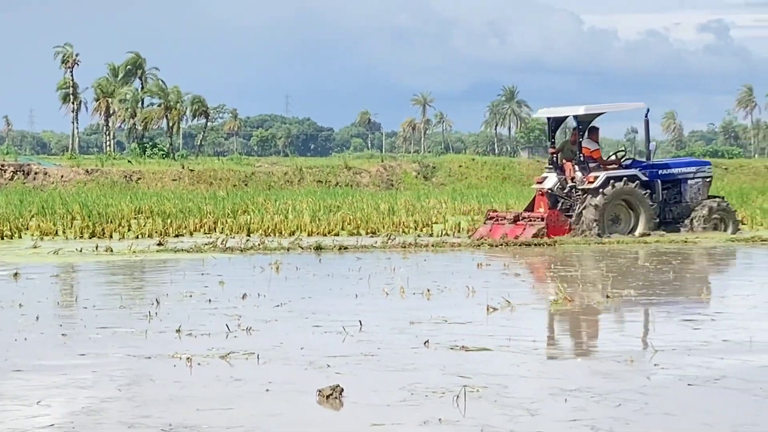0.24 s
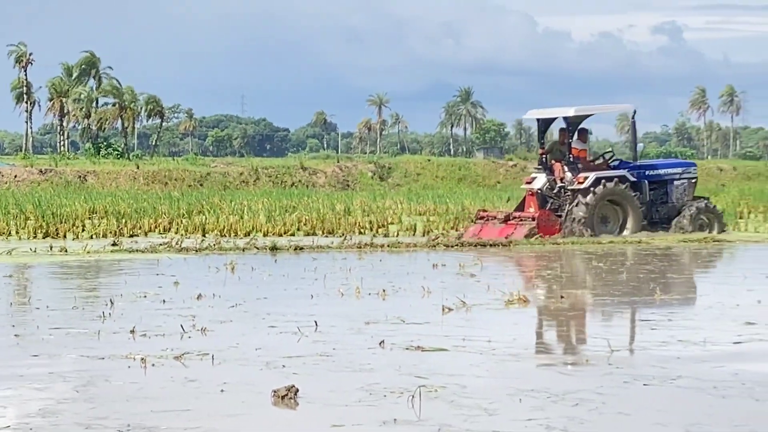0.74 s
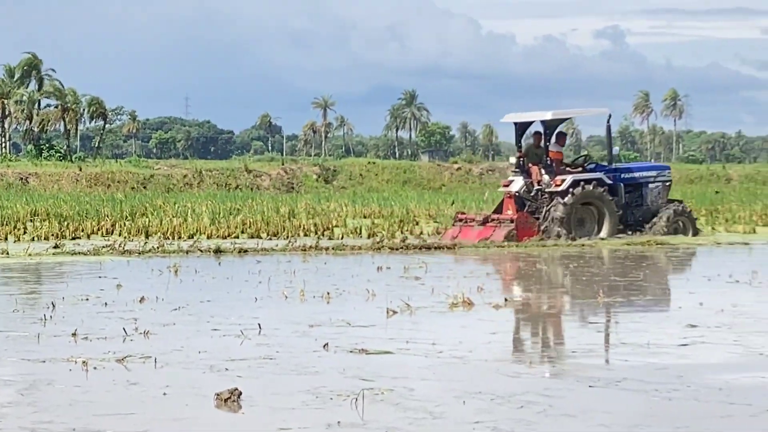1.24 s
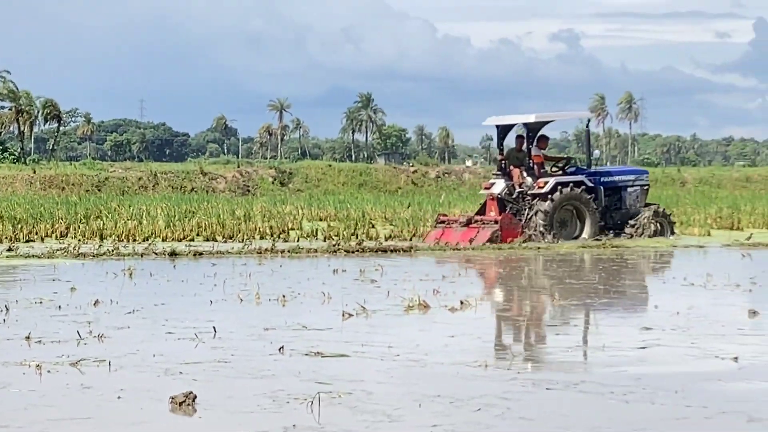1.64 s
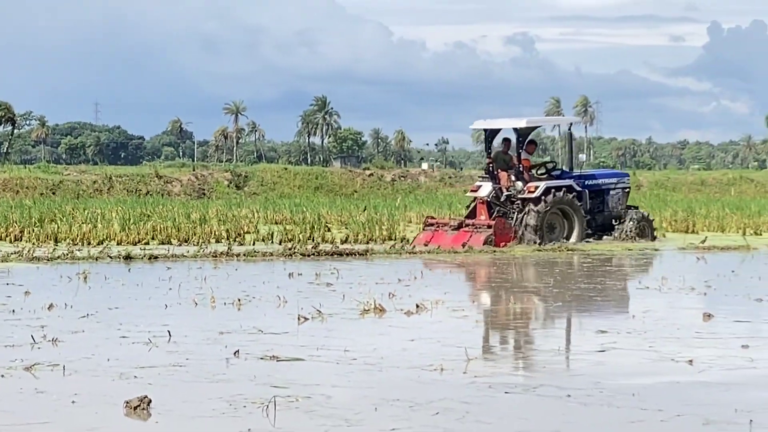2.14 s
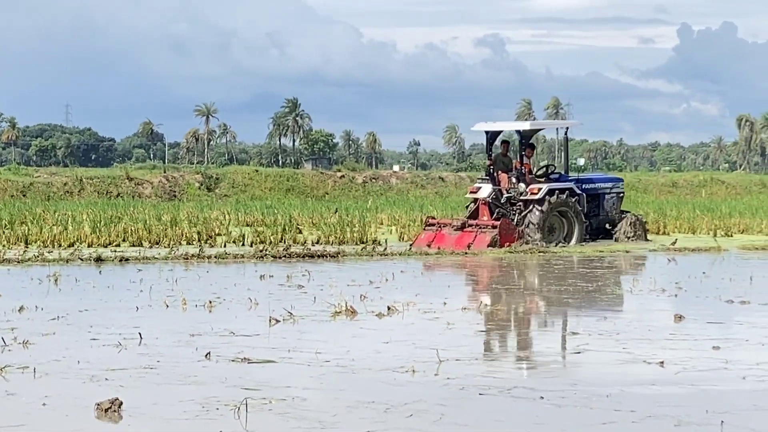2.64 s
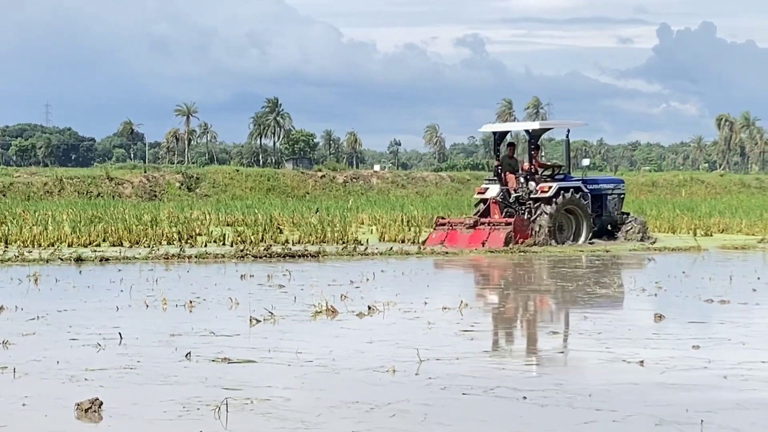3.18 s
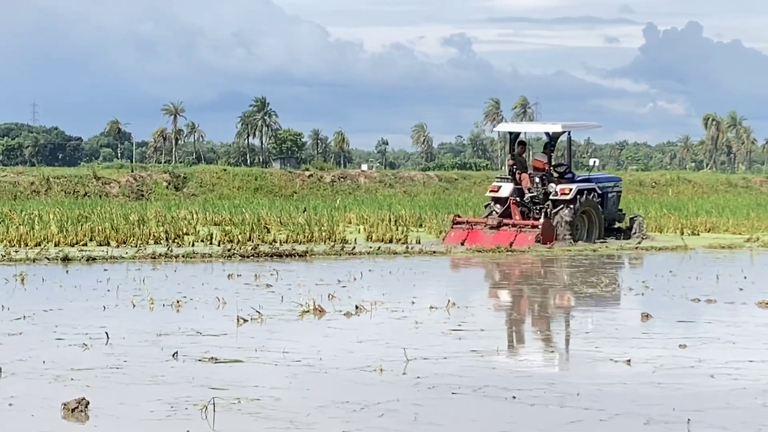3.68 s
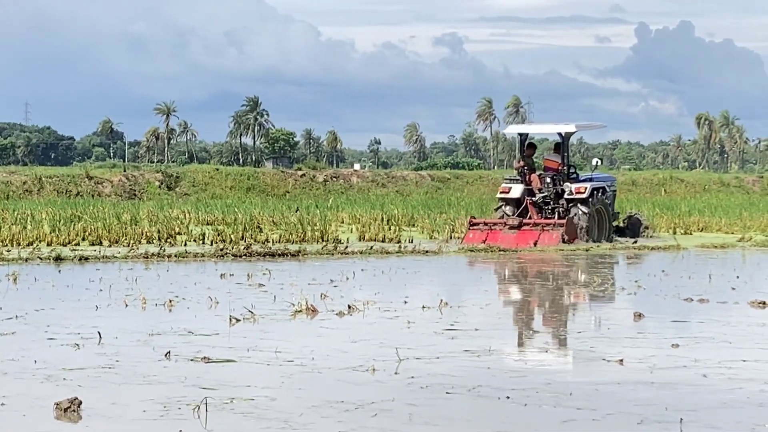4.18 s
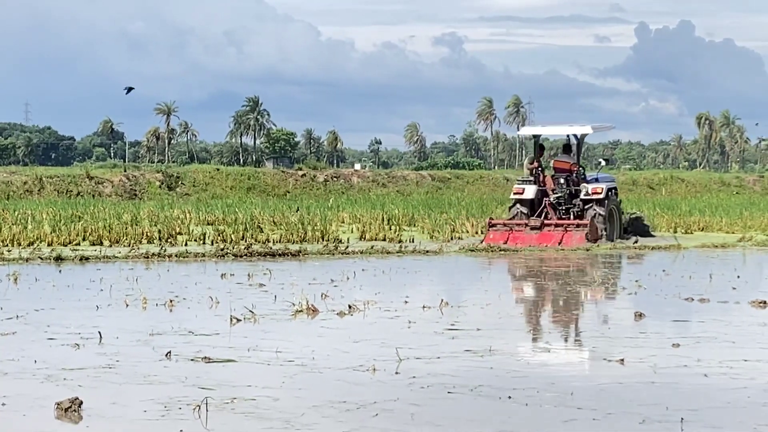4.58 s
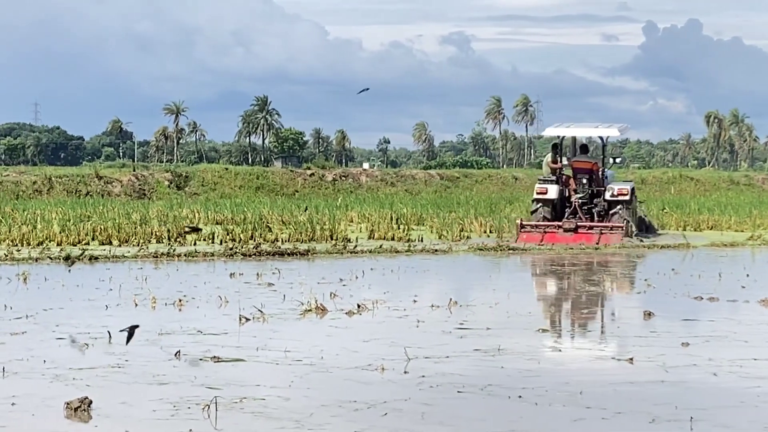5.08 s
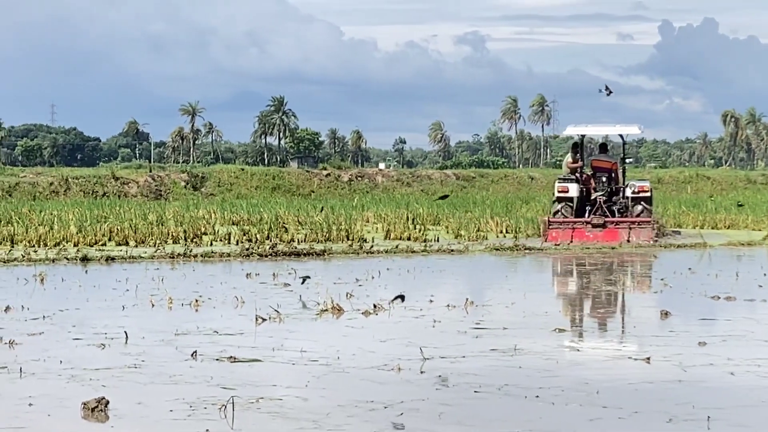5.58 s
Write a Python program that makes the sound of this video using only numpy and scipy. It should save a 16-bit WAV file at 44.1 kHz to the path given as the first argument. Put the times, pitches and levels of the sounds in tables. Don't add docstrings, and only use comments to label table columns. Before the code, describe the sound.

Outdoors in a flooded field, a diesel tractor holds a steady low drone with rapid exhaust pulses, metallic clatter, faint gear whine and hissing spray from its tiller. A bird calls several times early on. A thin cicada buzz swells into throbs and cuts off near the end, while clods plop into water. The machine grows slightly duller as it turns away. Stereo pickup on two closely spaced microphones.

```python
import sys
import numpy as np
from scipy import signal
from scipy.fft import rfft, irfft, next_fast_len
from scipy.io import wavfile

SR = 44100
rng = np.random.default_rng(int(sys.argv[2]) if len(sys.argv) > 2 else 0)


def gain_from_db(level_db):
    decades = np.asarray(level_db, float) / 20
    return 10 ** decades


def waveform_to_disk(signal):
    frames = np.transpose(np.atleast_2d(signal))
    scaled = np.clip(frames, -1, 1) * 32767
    samples = np.round(scaled).astype(np.int16)
    wavfile.write(sys.argv[1], SR, samples)


N = 256662
SIZE = next_fast_len(N)
T = np.arange(N) / SR
HZ = np.fft.rfftfreq(SIZE, 1 / SR)


def rms_one(x):
    return x / np.sqrt(np.mean(x ** 2) + 1e-20)


def in_time(rows):
    s, *columns = np.transpose(rows)
    return [np.interp(T, s, c) for c in columns]


def noise():
    return rng.standard_normal(N)


def coloured(x, spectrum):
    hz, level_db = np.transpose(spectrum)
    gain = gain_from_db(np.interp(np.log(HZ + 1), np.log(hz), level_db))
    return rms_one(irfft(rfft(x, SIZE) * gain, SIZE)[:N])


def drift(rate_hz):
    count = SIZE // 16
    lowpass = 1 + (HZ[:count // 2 + 1] / rate_hz) ** 2
    slow = irfft(rfft(rng.standard_normal(count)) / lowpass, count)
    return np.interp(np.arange(N) * count / SIZE, np.arange(count), rms_one(slow))


# time_s, firings_per_s
ENGINE_SPEED = [(0, 48.261), (.58, 48.358), (1.16, 48.235), (1.75, 48.21), (2.33, 48.333), (2.91, 47.93),
                (3.49, 48.755), (4.07, 48.153), (4.66, 48.385), (5.24, 47.763), (5.82, 48.495)]


def engine_cycle():
    firing_hz, = in_time(ENGINE_SPEED)
    return 2 * np.pi * np.cumsum(firing_hz / 3) / SR + .771


# time_s, loss_db
TURNING_AWAY = [
    (0, -0.5),
    (1.2, -0.5),
    (1.6, -0.2),
    (2.3, -1.5),
    (3.2, -1.5),
    (4.2, -2),
    (4.7, -3),
    (5.82, -3),
]


def turning_loss():
    return in_time(TURNING_AWAY)[0]


# order_per_cycle, level_db; every third is a firing order
EXHAUST_ORDERS = [(1, -31), (2, -40), (3, -3.5), (4, -23), (5, -24), (6, 1), (7, -16.5), (8, -15), (9, 0),
                  (10, -14), (11, -16), (12, -5.5), (13, -23.5), (14, -23.5), (15, -23), (16, -51),
                  (17, -46), (18, -56), (19, -22), (20, -23.5), (21, -15.5), (22, -33), (23, -39),
                  (24, -49), (25, -24)]
PIPE_AIM_SHARE = {3: 0.96, 9: -.3, 12: 0.32}


def exhaust(cycle, away_db):
    out = np.zeros(N)
    for order, order_db in EXHAUST_ORDERS:
        locked = order % 3 == 0
        sway_rad, unsteady_db = (.1, .5) if locked else (.9, 3.0)
        sway = sway_rad * np.sqrt(order / 6) * drift(2.6)
        start = -1.0 if locked else rng.uniform(0, 2 * np.pi)
        aim_db = PIPE_AIM_SHARE.get(order, 0) * (away_db - away_db.mean())
        level_db = order_db + aim_db + unsteady_db * drift(9.6)
        out += gain_from_db(level_db) * np.cos(order * cycle + start + sway)
    muffler = 2 * np.pi * 60
    b, a = signal.bilinear([1, 0, 0], [1, muffler / 1.2, muffler ** 2], SR)
    return gain_from_db(-23.5 + away_db + 1.5) * signal.lfilter(b, a, out)


def gate(cycle, depth_db, lag_firings):
    firing = 3 * cycle / (2 * np.pi) - lag_firings
    uneven_db = rng.normal(0, 1.64, int(firing[-1]) + 3)[firing.astype(int) + 1]
    return gain_from_db((depth_db + uneven_db) * np.exp(-2.5 * (firing % 1)))


def grit(spread_db):
    return noise() * gain_from_db(spread_db * drift(460.0))


def fine_ripple(spectrum):
    points_hz, points_db = np.transpose(spectrum)
    hz = np.arange(points_hz[0], points_hz[-1], 22.0)
    level_db = np.interp(np.log(hz), np.log(points_hz), points_db)
    return np.c_[hz, level_db + 1.5 * rng.standard_normal(len(hz))]


# freq_hz, density_db_per_hz
RUMBLE_SPECTRUM = [(25, -30), (45, -18), (70, -2), (120, -11.5), (180, -5), (280, -8), (400, -2.5),
                   (520, -4.5), (640, -13.5), (720, -32), (900, -46.5)]


def rumble(puff, away_db):
    return gain_from_db(-32.5 + 1.18 * away_db) * coloured(noise() * puff, fine_ripple(RUMBLE_SPECTRUM))


# freq_hz, density_db_per_hz
CLATTER_SPECTRUM = [(380, -39), (640, -3.5), (712, -7), (832, -4.5), (907, -8.5), (1020, 0), (1180, -1),
                    (1380, -10), (1840, -5.5), (2150, -10.5), (2350, -17.5), (2590, -13), (3810, -16),
                    (5840, -28.5), (6500, -27.5), (8450, -33), (14300, -120)]


def clatter(knock, away_db):
    contacts = grit(0.93) * knock * gain_from_db(0.5 * drift(57.0))
    return gain_from_db(-37 + 1.41 * away_db + 2.5) * coloured(contacts, fine_ripple(CLATTER_SPECTRUM))


# pitch_hz, start_db, end_db, width_hz
GEAR_WHINES = [(253.2, -45, -44.5, 3.19), (402, -34, -54.5, 9.7), (444, -46, -49.5, 6.84),
               (812, -53, -63.5, 9.3), (1066, -41.5, -65, 13.63), (1540, -42, -63, 5),
               (1695, -48.5, -56, 8.56)]


def whines():
    out = np.zeros(N)
    for hz, start_db, end_db, width_hz in GEAR_WHINES:
        pitch_hz = hz + width_hz / 2 * drift(4.86)
        fade_db = (end_db - start_db) * np.sqrt(T / T[-1])
        level_db = start_db + fade_db + 1.5 + 2.8 * drift(18.0)
        out += gain_from_db(level_db) * np.sin(2 * np.pi * np.cumsum(pitch_hz) / SR)
    return out


# freq_hz, density_db_per_hz
SPLASH_SPECTRUM = [(3500, -1), (5000, 5), (6200, -4.5), (7500, 3), (9000, 7), (11000, 2), (13000, -1),
                   (15300, 4), (15700, -22)]


def splash(spray, away_db):
    drops = grit(1.5) * spray * gain_from_db(1.5 * drift(3.6))
    return gain_from_db(-53.5 + 3.33 * away_db + 11) * coloured(drops, SPLASH_SPECTRUM)


# peak_s, peak_db, treble_db
THROWN_MUD = [
    (4.416, -37, 0),
    (4.715, -39, 3),
    (5.21, -41, -8),
    (5.4, -44, -11),
    (5.687, -45, 11),
]


def splats():
    dull = coloured(noise(), [(300, -14), (1000, 4), (4000, 0), (8000, -17), (15000, -28)])
    bright = gain_from_db(-10.5) * coloured(noise(), [(5000, -22), (9000, 4), (14000, -2), (16000, -20)])
    out = np.zeros(N)
    for s, peak_db, treble_db in THROWN_MUD:
        burst = (T > s) * np.exp(-np.abs(T - s) / 0.013)
        out += gain_from_db(peak_db) * burst * (dull + gain_from_db(treble_db) * bright)
    return out


# break_s, climb_s, top_hz, level_db
ARCHED_CALLS = [
    (.918, .045, 3850, -49),
    (1.335, .055, 3880, -47),
    (1.733, .045, 4050, -50),
]
# start_s, settled_hz, level_db, fade_db, chip_db
HOOKED_CALLS = [
    (2.258, 2830, -43, -2, -52),
    (2.688, 2790, -41, -7, -55),
    (3.165, 2780, -41, -8, -50),
]
# start_s, length_s, from_hz, to_hz, level_db
FAINT_SLIDES = [
    (1.15, .06, 5000, 2800, -62),
    (1.335, .045, 3870, 3830, -53),
    (1.555, .05, 5300, 3200, -63),
    (2.64, .025, 4400, 3700, -62),
    (3.1, .012, 3700, 3550, -53),
    (3.113, .014, 4900, 4100, -54),
    (4.545, .025, 4700, 4250, -59),
]


def bird_notes():
    notes = []
    for s, climb_s, top, db in ARCHED_CALLS:
        notes.append([(s - climb_s, 3550, db - 3),
                      (s - climb_s / 2, top - (top - 3550) / 8, db - 1),
                      (s, top, db),
                      (s + .021 / 3, (top + 2400) / 2, db - 2),
                      (s + .021, 2400, db + 1)])
    for s, hz, db, fade_db, chip_db in HOOKED_CALLS:
        sag_hz = 110
        notes.append([(s, hz + 340, db - 5),
                      (s + .008, hz + sag_hz / 2, db),
                      (s + .066 / 2, hz - sag_hz / 2, db + fade_db),
                      (s + .066, hz - sag_hz, db + fade_db)])
        chip_s, murmur_s = s - .033, s + .08
        notes.append([(chip_s, 3700, chip_db), (chip_s + .012, 3700 - 180, chip_db)])
        notes.append([(murmur_s, 2110, -57), (murmur_s + .063, 2110 - sag_hz / 2, -57)])
    for s, length_s, from_hz, to_hz, db in FAINT_SLIDES:
        notes.append([(s, from_hz, db - 5 / 2), (s + length_s, to_hz, db + 5 / 2)])
    return notes


def bird():
    out, waver = np.zeros(N), gain_from_db(2.2 * drift(70.0))
    for note in bird_notes():
        hz, level_db = in_time(note)
        fade = np.clip(np.minimum(T - note[0][0], note[-1][0] - T) / 0.005 + 1, 0, 1)
        phase = 2 * np.pi * np.cumsum(hz) / SR
        octave = gain_from_db(-16) * (hz > 3750) * np.sin(2 * phase)
        out += fade * waver * gain_from_db(level_db + 6) * (np.sin(phase) + octave)
    left = out + gain_from_db(-26) * np.roll(out, shift=620)
    right = np.roll(out, shift=-15) + gain_from_db(-10) * np.roll(out, shift=810)
    return np.array([gain_from_db(6.0) * left, gain_from_db(-2.5) * right])


def ring(clicks, hz, t60_s):
    r, w = gain_from_db(-60 / (t60_s * SR)), 2 * np.pi * hz / SR
    return signal.lfilter([0, np.sin(w)], [1, -2 * r * np.cos(w), r * r], clicks + 1e-18)


# time_s, throbs_counted, effort_0_to_1
CICADA_SONG = [
    (0, 0, 0),
    (1.5, 13.9, .1),
    (2.43, 22.5, .4),
    (3.195, 29.5, .6),
    (4.034, 37.5, .85),
    (4.463, 41.5, 1),
    (4.905, 45.5, 1),
]


def cicada():
    throbs, effort = in_time(CICADA_SONG)
    ranges_db = (-62, -43), (2, 13), (-12, 5), (12, -3)
    level_db, depth_db, upper_db, lowest_db = [low + (high - low) * effort for low, high in ranges_db]
    swell = np.interp((throbs + .5) % 1, [0, .04, .2, .3, .8, 1], [-.5, -1.8, -1.8, -.55, 0, -.1])
    beat = np.cumsum(138.0 * (1 + .025 * drift(30.0))) / SR
    sizes = gain_from_db(1.5 * drift(80.0))
    first, second = [sizes * (np.diff((beat + half) % 1, prepend=0) < 0) for half in (0, .5)]
    upper = gain_from_db(upper_db + .6 * depth_db * swell) * ring(first, 9650, .011)
    lower = ring(second, 9250, .009) + gain_from_db(lowest_db) * ring(second, 8800, .011)
    rings = (upper + lower) / np.hypot(gain_from_db(upper_db), gain_from_db(lowest_db))
    body = signal.butter(2, [8500, 9950], "band", fs=SR, output="sos")
    song = rms_one(signal.sosfilt(body, rings + .1 * noise()))
    return song * gain_from_db(level_db + depth_db * swell) * (T < CICADA_SONG[-1][0])


def wind():
    buffet = coloured(noise(), [(8, -9), (25, -5), (38, -15), (60, -20), (120, -50)])
    return gain_from_db(-62 + 3.3 * drift(3.0)) * buffet


# freq_hz, left_minus_right_db, likeness_0_to_1
PORT_BALANCE = [(30, 4.5, 0.94), (460, 2.5, 0.99), (660, 7.5, 1), (865, -1, 0.4), (950, 4, 1),
                (1440, 0, 0.8), (1530, 11.5, 1), (1940, 2, 0.87), (2400, 4.5, 0.53), (3080, 4.5, 0.6),
                (3860, 3, 0.82), (5700, -4, 0.4), (6130, 2, 0.86)]
# freq_hz, lead_rad; in the treble a plain delay of .23 ms
PORT_LEAD = [(0, 0), (550, -.2), (690, -2.0), (730, -3.9), (900, -5.6), (2000, -5.6), (2600, -6.1),
             (3300, -7.0), (3700, -5.7), (5000, -5.7), (5800, -6.4), (6400, -6.5), (7300, -5.9),
             (7900, -5.0), (8850, -3.6), (9500, -2.9), (10100, -1.8), (15900, 6.283)]


def ports(make, likeness_up=0.0, lead_up_rad=0.0):
    hz, tilt_db, alike = np.transpose(PORT_BALANCE + [(6400, 0, .99)])
    alike = np.clip(np.interp(HZ, hz, alike) + likeness_up, 0, 1)
    tilt = gain_from_db(np.interp(HZ, hz, tilt_db) / 2)
    lead_rad = np.interp(HZ, *np.transpose(PORT_LEAD)) + lead_up_rad
    direct, diffuse = rfft(make(), SIZE), rfft(make(), SIZE)
    right = alike * direct * np.exp(1j * lead_rad) + np.sqrt(1 - alike ** 2) * diffuse
    return irfft(np.array([direct * tilt, right / tilt]), SIZE)[:, :N]


def scene():
    away_db, cycle = turning_loss(), engine_cycle()
    puff, knock, spray = gate(cycle, 4.2, .52), gate(cycle, 4.3, .55), gate(cycle, 4.3, .52)
    drone = (exhaust(cycle, away_db) + whines()) * gain_from_db(np.array([[1.35], [-1.35]]))
    low = ports(lambda: rumble(puff, away_db))
    mid = ports(lambda: clatter(knock, away_db))
    high = ports(lambda: splash(spray, away_db))
    insect = ports(cicada, likeness_up=-0.02, lead_up_rad=.2)
    return drone + low + mid + high + ports(splats) + bird() + insect + ports(wind)


def band_limit(x):
    return signal.sosfilt(signal.butter(12, 16810, fs=SR, output="sos"), x)


def record(dry):
    top_cut = signal.cheby2(10, 60, 16200, fs=SR, output="sos")
    return band_limit(signal.sosfilt(top_cut, dry))


dry = scene()
out = record(dry)
waveform_to_disk(out)
```